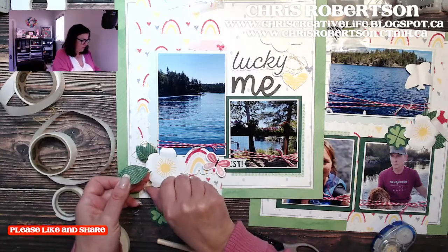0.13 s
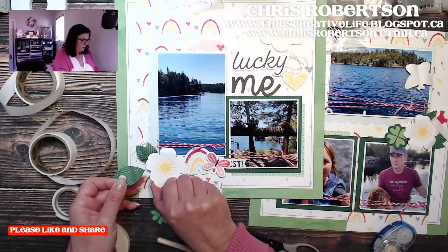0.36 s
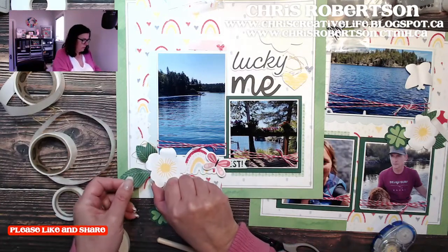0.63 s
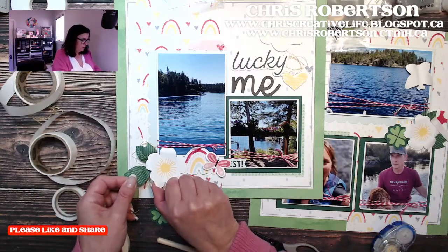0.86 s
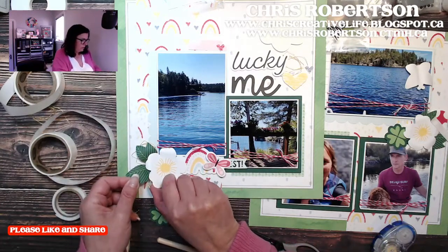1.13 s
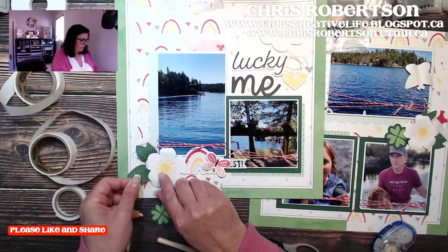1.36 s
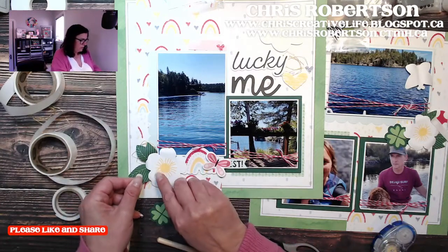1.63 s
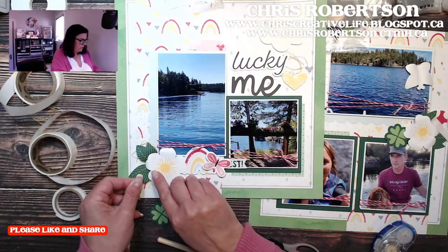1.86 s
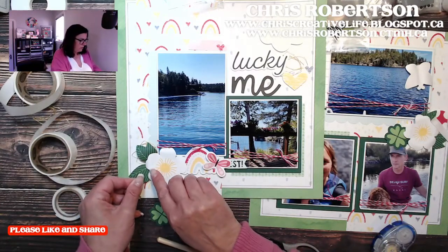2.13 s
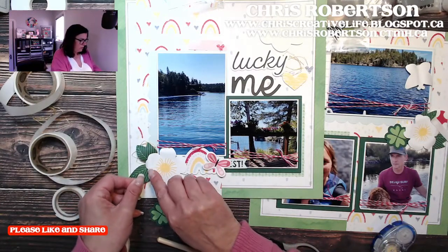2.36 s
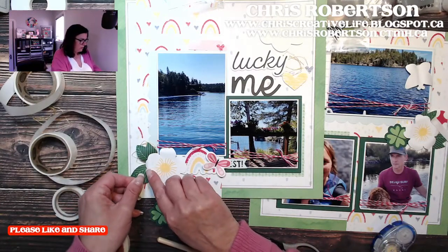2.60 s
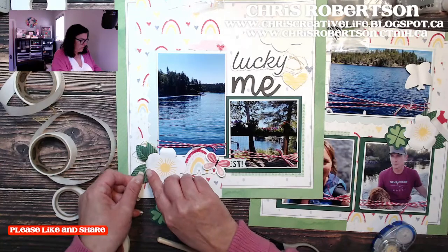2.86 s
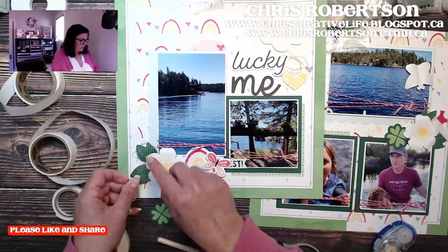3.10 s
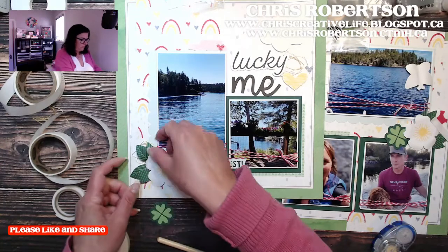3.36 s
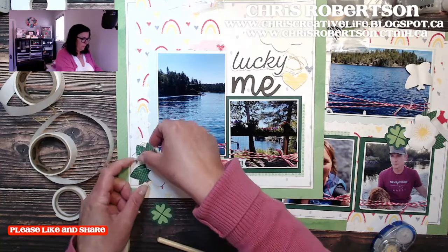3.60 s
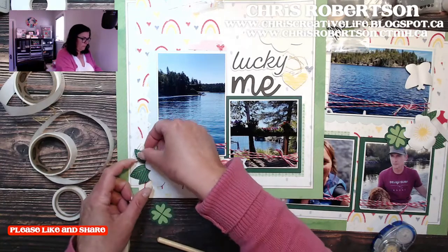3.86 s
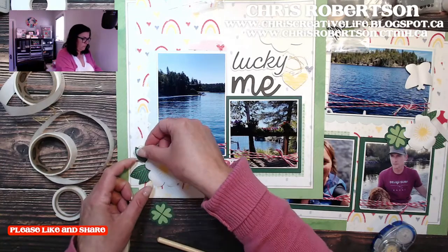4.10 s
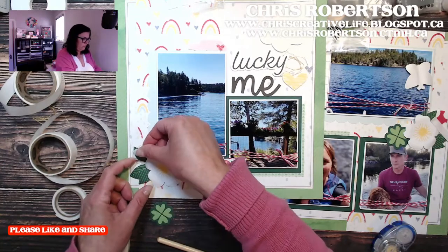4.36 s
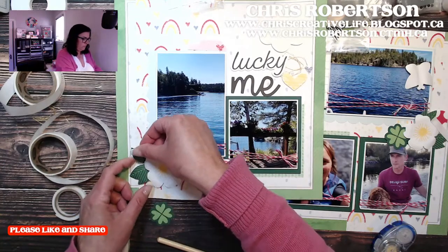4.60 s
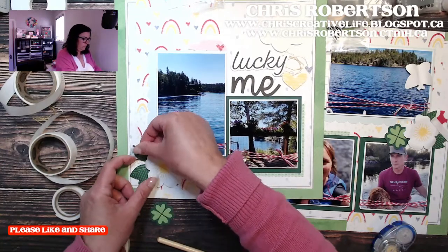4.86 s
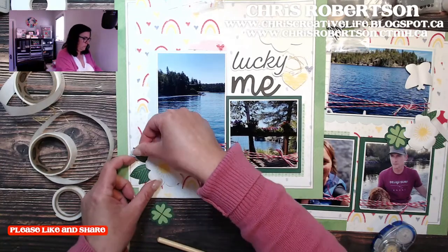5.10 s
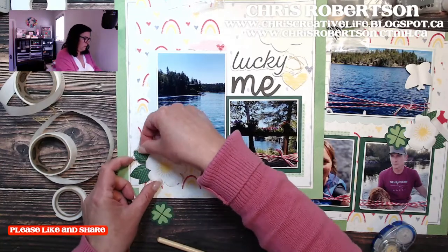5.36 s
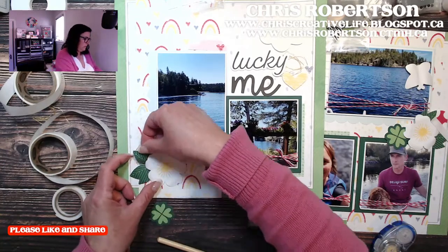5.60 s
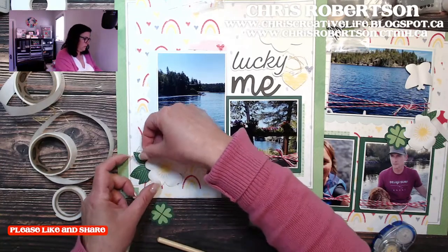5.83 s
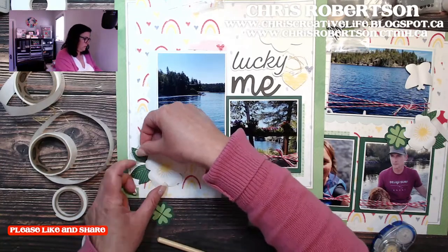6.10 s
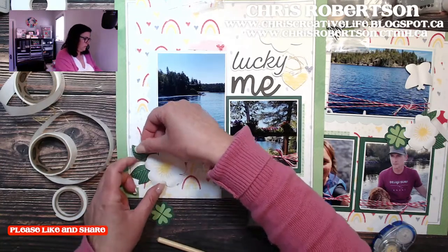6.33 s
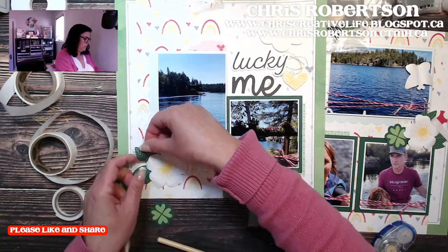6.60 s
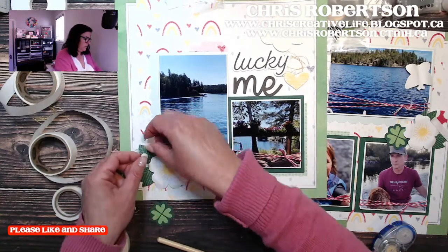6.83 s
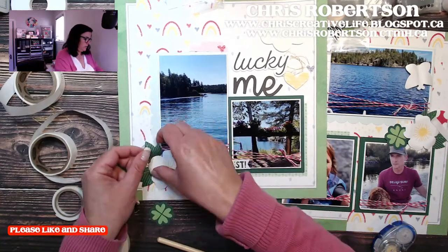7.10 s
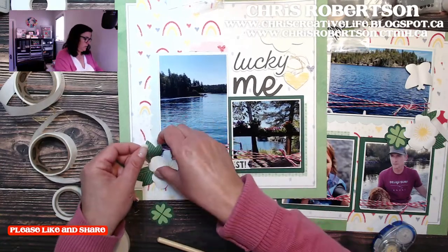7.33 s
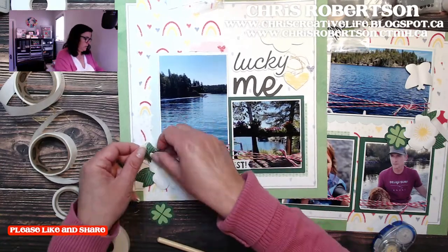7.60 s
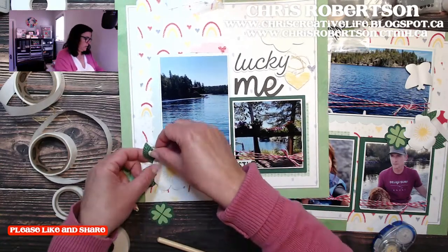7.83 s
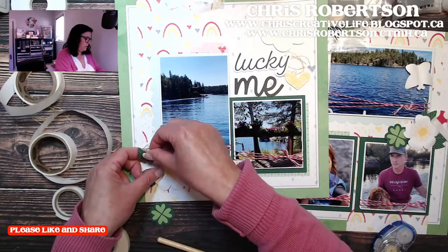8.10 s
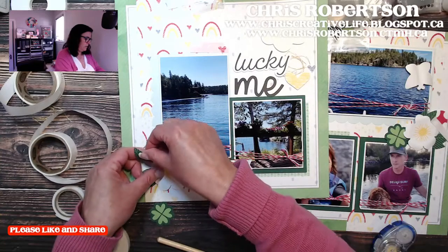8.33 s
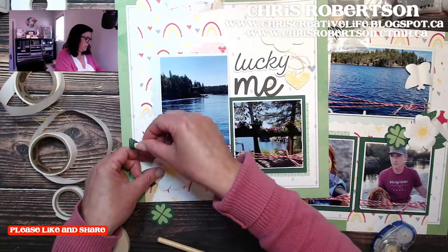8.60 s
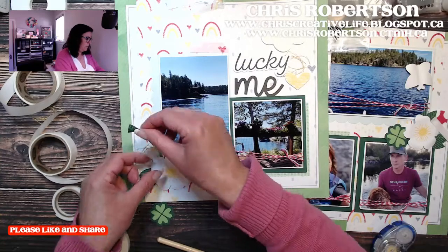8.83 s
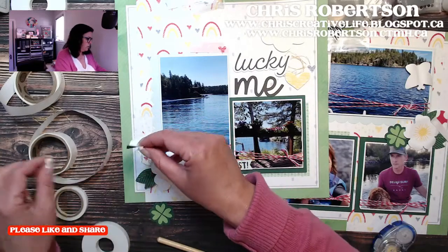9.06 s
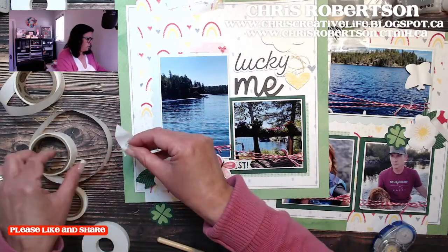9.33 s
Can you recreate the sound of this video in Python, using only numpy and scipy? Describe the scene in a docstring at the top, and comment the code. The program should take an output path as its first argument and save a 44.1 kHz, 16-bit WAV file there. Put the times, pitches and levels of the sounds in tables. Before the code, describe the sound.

In a small quiet indoor room, closely miked, paper decorations are slid, bent and pressed onto card. Bright crackling near the start peaks in a crisp snap, then thins to faint shuffling. Gentle taps and rustles follow, busier in the second half, until a loud snap with a dull thud; afterwards only a few tiny crisp ticks remain. Constant low mains hum, deep rumble and faint hiss lie under everything.

```python
"""Stiff paper under sliding, bending, pressing fingers, on a table in a small quiet room.
Rustle is rough noise through the shared colour of microphone and paper; snaps, thuds and ticks are noise bursts.
Firmer presses ring decaying sine modes of a hollow part of the desk.
Mains hum (sines), a deep building rumble and faint hiss (coloured noise) lie under it all."""
import sys
import numpy as np
from scipy import signal
from scipy.fft import rfft, irfft, next_fast_len
from scipy.io import wavfile
from scipy.ndimage import uniform_filter1d, map_coordinates

SR = 44100
rng = np.random.default_rng(int(sys.argv[2]) if len(sys.argv) > 2 else 0)


def level_to_linear(level):
    """Convert decibel levels to linear amplitude factors, elementwise."""
    exponent = np.asarray(level, float) / 20
    return 10 ** exponent


def to_wav(sig):
    """Store sig (one row per channel, or 1-D mono) as 16-bit WAV at the path in sys.argv[1].

    Samples outside -1..1 are clipped; the rate is SR.
    """
    pcm = np.clip(np.atleast_2d(sig), -1, 1) * 32767
    pcm = np.round(pcm).astype(np.int16)
    wavfile.write(sys.argv[1], SR, pcm.T)  # frames by channels


N = 416789

# strokes of paper under the fingers: start/s, length/s, crinkling level/dB,
# brightness/dB (bending is bright, flat sliding dull)
STROKES = [(0.0, 0.033, -70.5, -2.5), (0.07, 0.11, -70, 7), (0.269, 0.068, -64, 8), (0.37, 0.42, -74, 26),
           (0.6, 0.037, -74, 8), (0.945, .03, -61, 14), (0.984, 0.021, -55, 10.5), (1.11, 0.14, -62.5, 15),
           (1.2, 0.099, -56.5, 13.5), (1.3, 0.054, -61, 4), (1.5, 0.039, -65.5, 9), (1.6, 0.046, -63, 13),
           (2.04, 0.1, -83, 4), (2.39, 0.034, -74, 10), (2.61, 0.02, -65.5, 11), (2.75, 0.16, -76.5, 4),
           (3.03, 0.049, -64.5, 10), (3.08, 0.18, -71, -4.5), (3.29, 0.038, -74.5, 0),
           (3.609, 0.12, -63.5, 9), (3.71, 0.026, -61.5, 16), (3.789, 0.012, -68.5, -1),
           (3.848, 0.043, -61.5, 7.5), (3.988, 0.033, -59.5, 3), (4.15, 0.026, -68.5, -1),
           (4.268, 0.026, -64.5, -0.5), (4.33, 0.35, -75.5, -2.5), (4.62, 0.14, -75.5, -3.5),
           (4.9, 0.022, -72.5, 2), (4.99, 0.077, -73, -5), (5.128, 0.038, -59, 0), (5.198, 0.019, -53.5, 7),
           (5.309, 0.097, -67, 4), (5.428, 0.12, -63, 12), (5.598, 0.092, -65, 5), (5.74, 0.069, -70.5, 2),
           (5.87, 0.18, -73, 14), (5.968, 0.13, -63.5, 7), (6.158, 0.11, -67.5, 4), (6.32, .15, -70.5, 2),
           (6.51, 0.035, -61, 5), (6.613, 0.21, -64, 9), (6.72, 0.054, -60, 0), (6.77, 0.048, -61, 6),
           (6.878, .14, -66.5, 2.5), (7.08, 0.097, -70.5, 1), (7.26, 0.2, -74.5, 7),
           (7.389, 0.085, -65, 0.5), (7.5, 0.2, -70, 2), (7.625, 0.18, -61, 11), (7.768, 0.025, -56.5, 3),
           (7.83, 0.074, -67.5, -3), (7.94, 0.11, -71.5, -4), (8.1, 0.21, -78, -3),
           (8.29, 0.091, -65, -2.5), (8.41, 0.21, -65, -0.5), (8.76, 0.11, -81, 1.5),
           (9.0, 0.037, -71.5, 26), (9.174, 0.017, -64, 24), (9.349, 0.029, -67, 12)]
# the card's edge brushing the surface, a thin hiss: start/s, length/s, level/dB
BRUSHES = [(0.084, 0.044, -66.5), (0.532, 0.098, -74), (1.217, 0.11, -75), (3.07, 0.23, -69.5),
           (3.685, 0.038, -71), (3.77, .04, -73), (3.82, 0.14, -73), (5.488, 0.046, -75),
           (5.884, 0.068, -71.5), (6.738, 0.041, -58), (7.396, .06, -71), (7.148, 0.046, -74),
           (7.611, 0.095, -66), (8.991, 0.049, -69), (9.167, 0.036, -70), (9.337, 0.024, -64.5)]
# shared colour of microphone and paper: f/Hz, width/Hz, level/dB
COLOUR_PEAKS = [(1300, 260, -2), (1860, 60, 1.5), (2216, 490, -0.5), (2570, 96, 1), (3330, 690, -2),
                (4170, 220, 6.5), (5200, 2800, 0), (7460, 1280, 10.5), (9200, 250, 4), (12400, 500, -4),
                (14300, 1000, -16.5)]
# relative spectra of friction, ahead of the shared colour: f/Hz, density/dB
SLIDING_SPECTRUM = [(500, -37), (1000, 0.5), (2200, 0.5), (3500, -7), (6000, -43.5)]
CRINKLING_SPECTRUM = [(2000, 1), (3500, 10), (6000, 6), (9000, -2), (11000, -1)]
AIRY_SPECTRUM = [(7000, -20.5), (10000, -9.5), (13500, -6), (15800, -17)]
# mains lines, ahead of their slow drift: f/Hz, level/dB rms
HUM_LINES = [(60, -48.5), (120, -71), (180, -84.5), (300, -83.5)]
# relative spectra of building rumble and hiss: f/Hz, density/dB
RUMBLE_SPECTRUM = [(4, -60), (10, 1), (15, 0), (22, -4), (30, -20), (50, -16), (80, -21.5), (150, -28.5),
                   (250, -33.5), (400, -45)]
HISS_SPECTRUM = [(250, -18.5), (400, -15), (700, -17.5), (1200, -23.5), (2500, -29.5), (7500, -33),
                 (10500, -35), (13000, -37.5), (16000, -72)]
# modes of the hollow part of the desk: f/Hz, level/dB, free t60/s
DESK_MODES = [(399.5, 4, 1.08), (367, -7, 2.5), (345, -18.5, 1.6)]
# decay of the room: f/Hz, t60/s
ROOM_DECAY = [(300, 0.36), (2000, 0.33), (6000, 0.23), (14000, 0.084)]
# paper snaps: t/s, peak of the middle band/dB, body re that/dB, edge re that/dB
SNAPS = [(0.0326, -55, -4, 3), (0.1042, -50.5, -24, -12), (0.2723, -46.5, -3.5, -2),
         (0.3164, -52.5, -7, -5), (0.872, -53.5, -5, 2.5), (0.913, -55.5, -2.5, 1),
         (0.9448, -47.5, -21, -2), (0.991, -39, -14, -7), (1.0208, -46, -6, -2), (1.0587, -50, -8, -2),
         (1.1152, -55, -5, 3), (1.155, -55, -4, 3), (1.19, -45.5, -10, -3), (1.227, -50, -18, -13),
         (1.287, -42, -17, 3), (1.318, -45, -11, 1), (1.349, -44, -6, -2), (1.508, -52.5, -9, -9),
         (1.5304, -62.5, 4, 6), (1.5698, -23.5, -8, -2), (1.591, -32, -11, -2), (1.6163, -31, -4, -1.5),
         (1.6369, -32, -4, -2), (1.699, -44.5, -0.5, 5.5), (1.741, -38.5, -12, -10), (2.137, -55, -9, -2),
         (2.4104, -52.5, -10, 0.5), (2.5805, -59, -8, 0), (2.607, -51.5, -15, -17),
         (2.6209, -44.5, -19, -4), (2.6853, -49.5, -23, -8), (2.7325, -47, -7.5, -1.5),
         (2.7715, -42.5, -15, -2), (2.82, -49, -14, -6), (2.872, -46.5, -18, -9), (2.968, -50.5, -27, -10),
         (3.018, -57, -3, -4), (3.0642, -35.5, -4.5, 3), (3.3758, -57, -2, -15), (3.6046, -47.5, -7, 1.5),
         (3.6951, -40, -8, 1), (3.8317, -61, -8, 7), (3.87, -52, -5, -5), (3.8964, -66, -5, -5),
         (3.923, -60, -16, -12), (4.2667, -54.5, -3, -14), (4.4013, -54, 2.5, -12), (4.4413, -51, -6, -3),
         (4.4836, -55, -17, -12), (4.5273, -64, 7, -10), (4.9053, -46, -4.5, -11), (4.979, -53.5, 0, 0),
         (4.9978, -43.5, -3, 3.5), (5.0499, -50, 1, -16), (5.106, -39, -6, -8), (5.1367, -46, -13, -11),
         (5.3372, -38.5, -11, -3.5), (5.4995, -32.5, -34, -5.5), (6.088, -46.5, -15, -13),
         (6.1834, -47.5, -7, -0.5), (6.322, -50.5, 2, -10), (6.368, -59, -6, 6), (6.5091, -51, -6, -1),
         (6.5296, -50, -9, 1), (6.6129, -57, 2, 5), (6.7005, -39, -2.5, -8), (6.7593, -33.5, -4.5, -7),
         (6.9232, -47.5, -17, -11), (6.9526, -48, -7, -10), (6.9914, -47, -4, 0.5),
         (7.1531, -33.5, -5.5, -2.5), (7.2759, -66.5, -17, 9), (7.501, -56.5, -10, 4.5),
         (7.5616, -41.5, -6, -5), (7.6335, -51.5, 3, 1), (7.6909, -39, -9.5, -5), (8.025, -49.5, -7, 6),
         (8.3124, -53, -16, -10), (8.3824, -41, -12, -6), (8.4407, -50, -21, -8), (8.5546, -21.5, -7, -5),
         (9.0319, -55, -19, -2), (9.195, -51, -8, 4), (9.2169, -43.5, -21, 4), (9.3724, -54.5, -20, 7.5)]
# presses that reach the desk: t/s, level/dB, share of the free t60 left by resting hands
PRESSES = [(0.098, -65, 0.94), (0.229, -61, 0.76), (0.353, -53, 0.57), (1.233, -65, 0.87),
           (1.601, -60.5, 0.76), (1.976, -63, 0.55), (2.725, -53, 0.6), (3.085, -52.5, 0.55),
           (4.038, -63.5, 0.68), (4.873, -68, 0.82), (5.084, -47, 0.85), (6.56, -72, 0.75),
           (6.761, -69, 0.53), (8.055, -70.5, 0.56), (8.583, -62, 0.54)]
# fingertips landing on the page: t/s, peak/dB
THUDS = [(0.272, -67), (0.317, -65), (1.570, -60), (3.063, -58), (5.051, -46), (5.106, -52), (5.137, -63),
         (5.338, -54.5), (5.500, -60), (6.528, -68), (6.760, -49), (7.153, -61), (8.382, -61), (8.554, -44)]
# fingernails on the card: t/s, peak/dB
TICKS = [(4.4003, -57), (4.4443, -58), (4.4825, -57), (4.5281, -56), (5.0507, -48), (5.143, -49),
         (6.753, -48), (6.9493, -59), (6.992, -53), (8.5548, -42)]

ATTACK_S, RELEASE_T60_S = 0.013, 0.23  # of a stroke
# after a snap the sheet crinkles on; level re the snap's peak
SETTLE_DB, SETTLE_BRIGHT_DB, SETTLE_T60_S = -22, 17, 0.1
RESTING_DB, RESTING_BRIGHT_DB = -84, 0.5  # hands never lie quite still
AIRY_DB, AIRY_DB_PER_BRIGHT_DB = -13, 0.1  # airy top re crinkling
CATCHES_PER_S, CATCH_T60_S = 150, 0.01
HISS_OVER_CATCHES, FLUTTER_DB = 1.9, 2.2
BURST_RISE_S = 0.0007
PRESS_SCATTER_DB = 2.1  # press to press and mode to mode
ROOM_DB, ROOM_DELAY_SAMPLES = -12.0, 250
TOP_HZ = 15850


def unit(x):
    """Scaled to rms 1."""
    return x / np.sqrt(np.mean(x ** 2) + 1e-20)


def along(points, hz):
    """(Hz, value) points on a log axis."""
    f, v = np.transpose(points)
    return np.interp(np.log(hz + 1), np.log(f + 1), v)


def filtered(x, response):
    """x times a complex response of frequency."""
    m = next_fast_len(x.shape[-1] + 8192)
    return irfft(rfft(x, m) * response(np.fft.rfftfreq(m, 1 / SR)), m)[..., :x.shape[-1]]


def band(x, lo_hz, hi_hz):
    """Causal band-pass along the last axis."""
    sos = signal.butter(3, [lo_hz, hi_hz], "bandpass", fs=SR, output="sos")
    return signal.sosfilt(sos, x)


def coloured(spectrum):
    """Noise of rms 1 with the given spectrum."""
    return unit(filtered(rng.standard_normal(N), lambda hz: level_to_linear(along(spectrum, hz))))


def wobble(rate_hz):
    """Smooth random curve, rate_hz knots a second."""
    knots = rng.standard_normal(int(N * rate_hz / SR) + 4)
    return map_coordinates(knots, [np.arange(N) * rate_hz / SR])


def peaks(f, modes):
    """Gain of (Hz, width, dB) resonances whose powers add."""
    return np.sqrt(sum(level_to_linear(2 * db) / (1 + (2 * (f - c) / w) ** 2) for c, w, db in modes))


def shared_colour(f):
    """Shared colour of microphone and paper, as a gain."""
    return peaks(f, COLOUR_PEAKS)


def laid(s, rows):
    """Short sounds summed at their times."""
    at = np.round(s * SR).astype(int)[:, None] + np.arange(rows.shape[1])
    return np.bincount(at.ravel(), rows.ravel(), N + 2 * SR)[:N]


def peak(rows, level_db):
    """Each row scaled to its peak level."""
    return rows / np.abs(rows).max(axis=1, keepdims=True) * level_to_linear(level_db)[:, None]


def burst(t, t60_s):
    """Quick rise, exponential fall."""
    return level_to_linear(-60 * t / t60_s) * (1 - np.exp(-t / BURST_RISE_S))


def swell(s, length_s, db):
    """Power of movements that rise, hold and fall."""
    t = np.arange(SR // 2) / SR
    rise = np.clip(t / ATTACK_S, 0, 1) ** 2
    fall = level_to_linear(-60 * np.maximum(t - length_s[:, None], 0) / RELEASE_T60_S)
    return laid(s, (level_to_linear(db)[:, None] * rise * fall) ** 2)


def layer_offsets(bright_db):
    """Slide, crinkle and airy top re crinkling, in dB: a bright movement slides less."""
    return -bright_db, 0 * bright_db, AIRY_DB + AIRY_DB_PER_BRIGHT_DB * bright_db


def motion():
    """Gains of slide, crinkle and airy top: strokes, settling, rest and brushes add in power."""
    s, length_s, db, bright_db = np.transpose(STROKES)
    snap_s, snap_db = np.transpose(SNAPS)[:2]
    decay = level_to_linear(-60 * np.arange(SR // 2) / SR / SETTLE_T60_S)
    offsets = zip(layer_offsets(bright_db), layer_offsets(SETTLE_BRIGHT_DB), layer_offsets(RESTING_BRIGHT_DB))
    powers = []
    for stroke_off, settle_off, rest_off in offsets:
        strokes = swell(s, length_s, db + stroke_off)
        settling = laid(snap_s, (level_to_linear(snap_db + SETTLE_DB + settle_off)[:, None] * decay) ** 2)
        powers.append(strokes + settling + level_to_linear(RESTING_DB + rest_off) ** 2)
    slide, crinkle, airy = powers
    return np.sqrt([slide, crinkle, airy + swell(*np.transpose(BRUSHES))])


def friction(grain, spectrum, patchy_db):
    """Paper grain through one spectrum and the shared colour, drifting a little in patches."""
    z = signal.stft(grain * rng.standard_normal(N), nperseg=256)[2]
    field = uniform_filter1d(rng.standard_normal(z.shape), size=3, axis=0)
    field = uniform_filter1d(field, size=24, axis=1)
    noise = signal.istft(z * level_to_linear(patchy_db * unit(field)), nperseg=256)[1][:N]
    return unit(filtered(noise, lambda hz: shared_colour(hz) * level_to_linear(along(spectrum, hz))))


def rustle():
    """Fibres catch in random ticks over a fluttering hiss, shared by slide, crinkle and airy top."""
    catches = (rng.random(N) < CATCHES_PER_S / SR) * level_to_linear(3 * rng.exponential(size=N))
    decay = level_to_linear(-60 * np.arange(SR // 30) / SR / CATCH_T60_S)
    ticking = unit(signal.fftconvolve(catches, decay)[:N])
    grain = (HISS_OVER_CATCHES + ticking) * level_to_linear(FLUTTER_DB * wobble(25))
    # the exponent sets the depth of the grain
    layers = [friction(grain ** 0.6, SLIDING_SPECTRUM, 1.8),
              friction(grain, CRINKLING_SPECTRUM, 2.5),
              friction(grain ** 1.3, AIRY_SPECTRUM, 3)]
    return sum(gain * layer for gain, layer in zip(motion(), layers))


def hum():
    """Mains harmonics as sines, their common level drifting slightly."""
    t = np.arange(N) / SR
    lines = sum(np.sqrt(2) * level_to_linear(db) * np.sin(2 * np.pi * hz * t) for hz, db in HUM_LINES)
    return lines * level_to_linear(0.24 * wobble(4))


def rumble():
    """Deep building rumble: steady low noise."""
    return level_to_linear(-47.0) * coloured([(1, -68)] + RUMBLE_SPECTRUM + [(900, -67)])


def hiss():
    """Faint steady noise."""
    return level_to_linear(-72.5) * coloured(HISS_SPECTRUM)


def desk_murmur():
    """A faint, slowly wavering ring of the desk modes: noise through narrow resonances."""
    modes = [(hz, 8, db) for hz, db, _ in DESK_MODES]
    murmur = filtered(rng.standard_normal(N), lambda f: peaks(f, modes))
    return level_to_linear(-77.5 + 4.5 * wobble(3.0)) * unit(murmur)


def room(x):
    """Noise tails in which each frequency dies at its own speed; a fresh tail every quarter second."""
    out, step = np.zeros(N + SR), SR // 4
    for start in range(0, N, step):
        hz, t, z = signal.stft(rng.standard_normal(SR // 2), SR, nperseg=256)
        decay = level_to_linear(-60 * t / along(ROOM_DECAY, hz)[:, None])
        tail = signal.istft(z * decay, SR, nperseg=256)[1]
        wet = signal.fftconvolve(x[start:start + step], tail / np.linalg.norm(tail))
        out[start + ROOM_DELAY_SAMPLES:][:len(wet)] += wet
    return out[:N]


def snaps():
    """A fold buckles: milliseconds of crackle in the shared colour, lower parts lasting longer."""
    s, db, body_db, edge_db = np.transpose(SNAPS)
    t = np.arange(SR // 20) / SR
    crackle = filtered(rng.standard_normal((len(s), len(t))), shared_colour)
    body = peak(band(crackle * burst(t, 0.036), 1674, 3100), db + body_db)
    middle = peak(band(crackle * burst(t, 0.021), 2950, 6250), db)
    edge = peak(band(crackle * burst(t, 0.017), 5700, 15000), db + edge_db)
    return laid(s, body + middle + edge)


def desk_ring():
    """A soft fingertip swells the modes up slowly, then they ring on; the level flickers."""
    out, t = np.zeros(N + 2 * SR), np.arange(SR) / SR
    chance = rng.standard_normal((len(PRESSES), len(DESK_MODES)))
    rise = 1 - np.exp(-t / 0.01)
    for (s, db, free), row in zip(PRESSES, chance):
        ring = 0
        for (hz, mode_db, t60_s), c in zip(DESK_MODES, row):
            level_db = mode_db + PRESS_SCATTER_DB * c - 60 * t / (free * t60_s)
            ring = ring + level_to_linear(level_db) * np.sin(2 * np.pi * hz * t)
        out[round((s - 0.015) * SR):][:len(t)] += level_to_linear(db) * ring * rise  # swell starts 15 ms early
    return out[:N] * level_to_linear(2.2 * wobble(18))


def thuds():
    """A soft fingertip: a dull puff of low noise through the page."""
    s, db = np.transpose(THUDS)
    t = np.arange(SR // 20) / SR
    puff = rng.standard_normal((len(s), len(t))) * burst(t, 0.17)
    return laid(s, peak(band(puff, 337, 810), db))


def ticks():
    """A nail excites the lowest ring of the card for a moment."""
    s, db = np.transpose(TICKS)
    t = np.arange(SR // 20) / SR
    card = filtered(rng.standard_normal((len(s), len(t))), shared_colour) * burst(t, 0.061)
    return laid(s, peak(band(card, 860, 1720), db))


def scene():
    """Paper in the room, the desk and the background."""
    paper = rustle() + snaps() + thuds() + ticks()
    desk = desk_murmur() + desk_ring()
    background = hum() + rumble() + hiss()
    return (paper + level_to_linear(ROOM_DB) * room(paper) + desk + background)[None]


def roll_off(x):
    """The treble ends steeply here."""
    return signal.sosfilt(signal.butter(12, 16370, fs=SR, output="sos"), x)


def record(dry):
    """Sharp band limit at TOP_HZ, then the finished mix goes out."""
    mix = filtered(dry, lambda hz: hz < TOP_HZ)
    return roll_off(mix)


dry = scene()
out = record(dry)
to_wav(out)
```